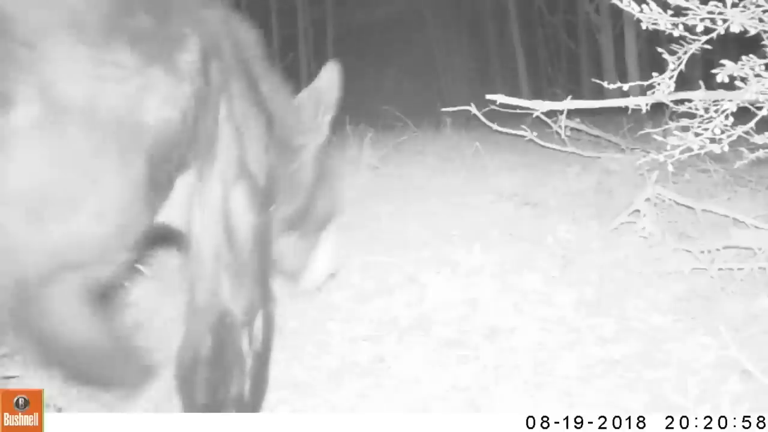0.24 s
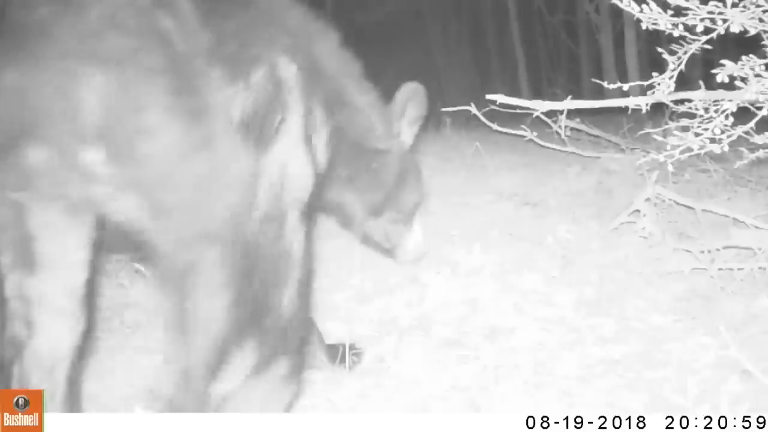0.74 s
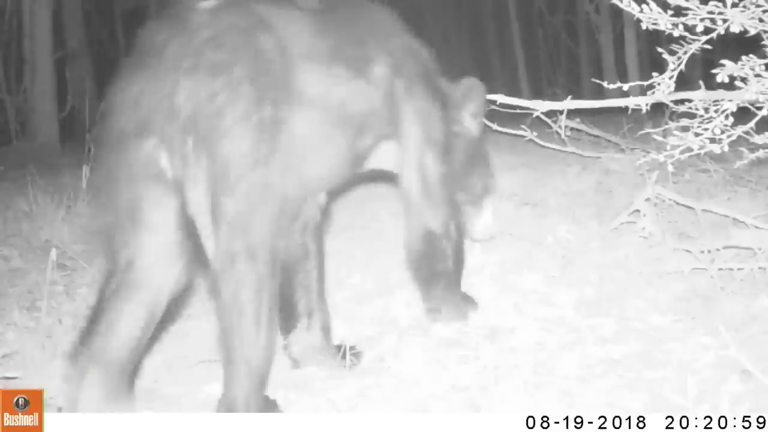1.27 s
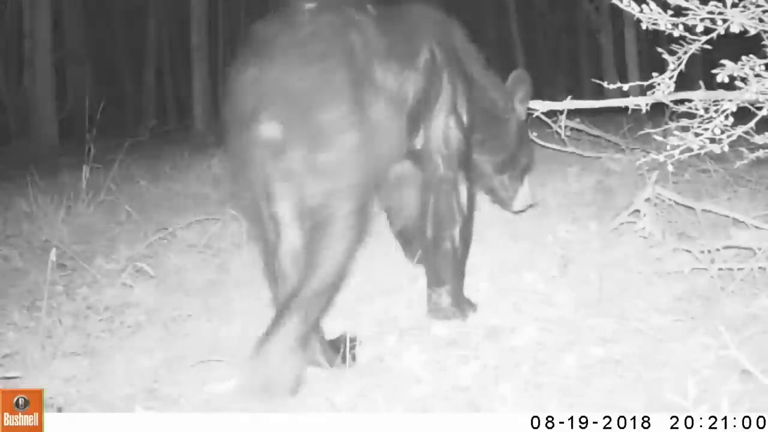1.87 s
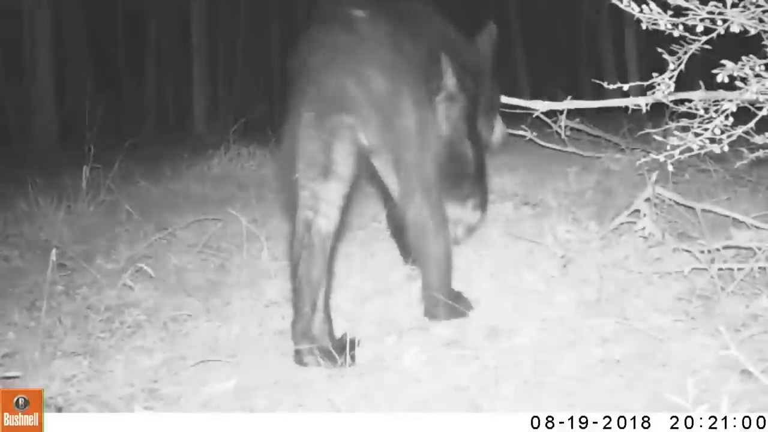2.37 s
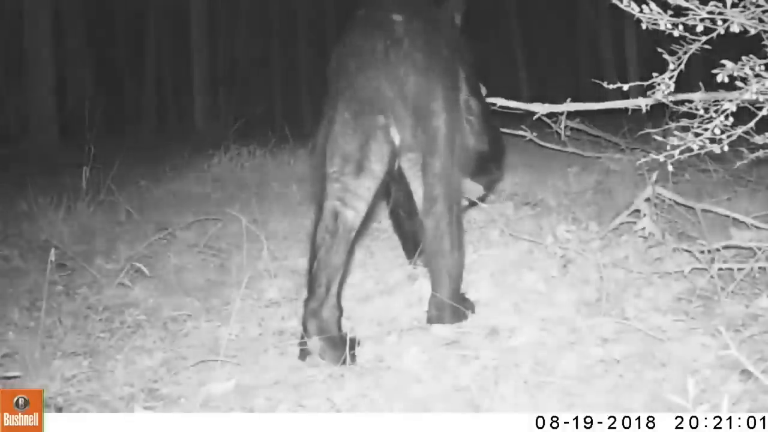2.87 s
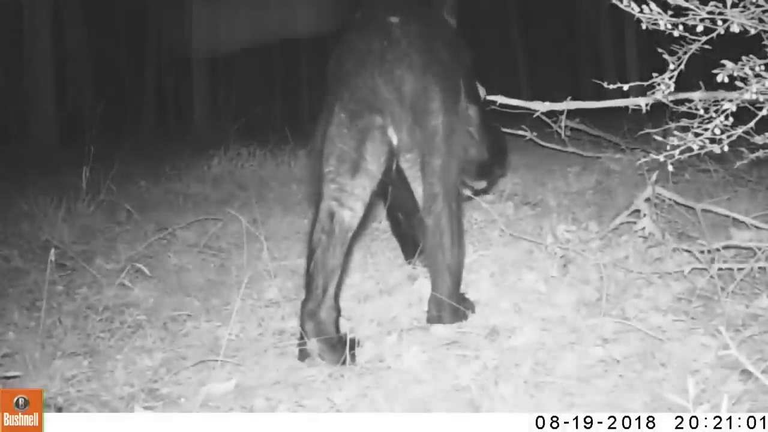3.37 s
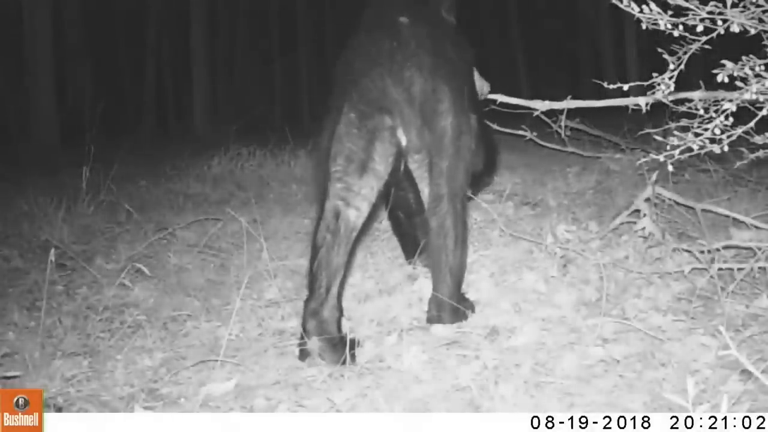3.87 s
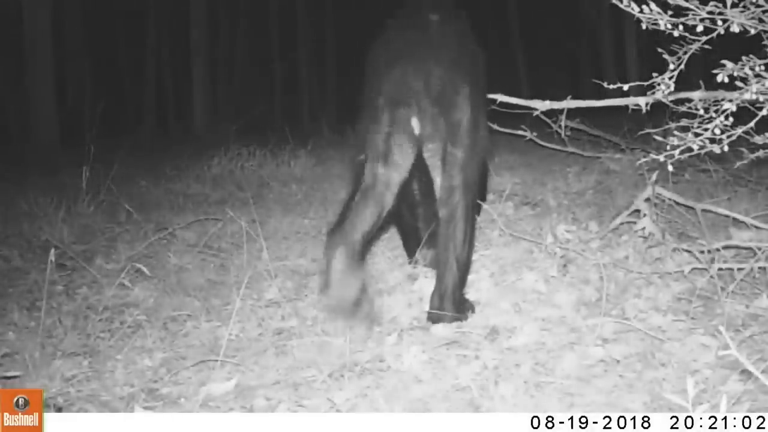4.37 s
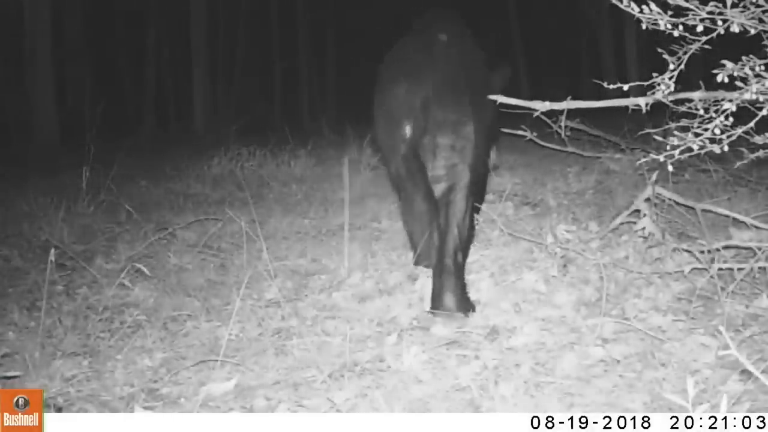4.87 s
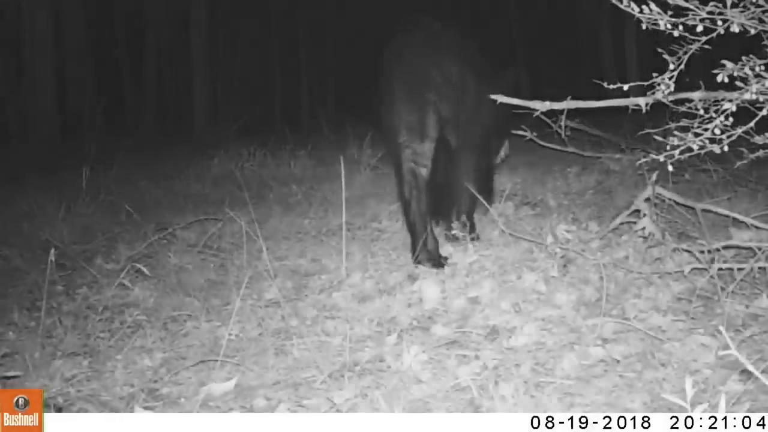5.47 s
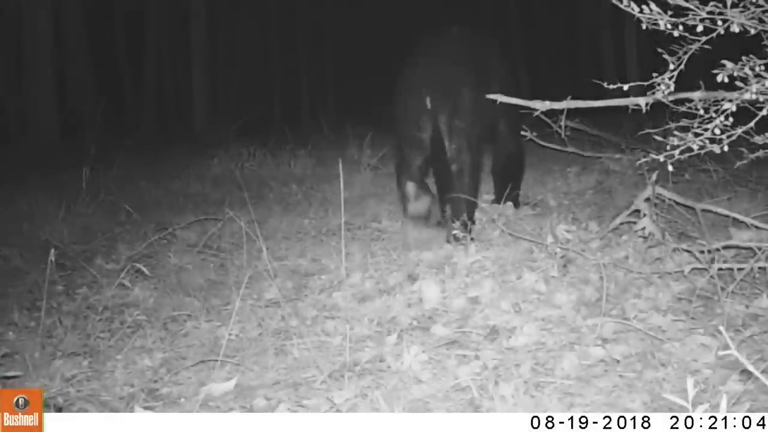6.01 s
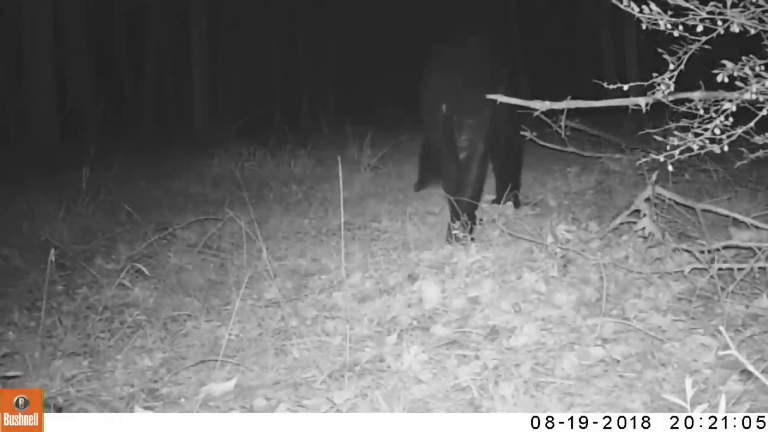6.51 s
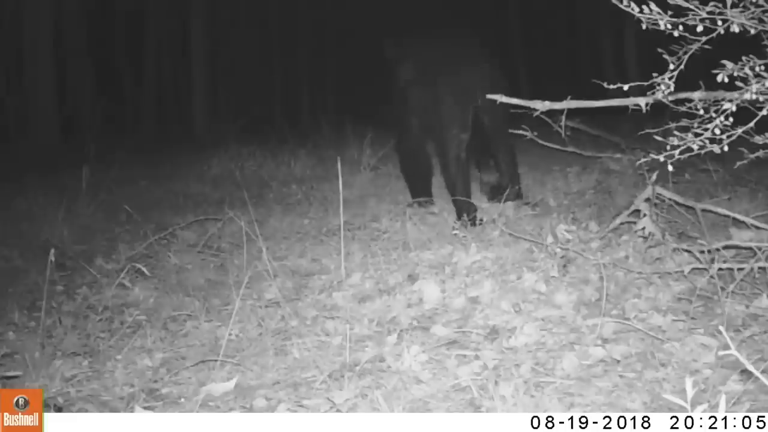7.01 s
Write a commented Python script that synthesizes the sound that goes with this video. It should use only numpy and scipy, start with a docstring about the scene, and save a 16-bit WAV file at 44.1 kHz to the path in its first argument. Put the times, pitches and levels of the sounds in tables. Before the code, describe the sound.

Nearly muted at first, then suddenly open: pulsing cricket trills, scratchy katydid rasps and a dense hissing buzz above a deep, soft night drone.

```python
"""Night at a wood's edge: one microphone starts nearly muted, then the level steps up after 0.385 s.
From the start a conehead's dense noise buzz comes and goes in bouts and crickets trade trills of falling tones.
Katydids soon rasp in phrases of tooth-modulated noise, while farther ones swell and sink in regular waves.
Throughout lie narrow noise bands of far tree crickets, a wavering drone in low air noise, and a soft roar."""
import sys
import numpy as np
from scipy import signal
from scipy.fft import rfft, irfft
from scipy.io import wavfile

SR = 44100
rng = np.random.default_rng(int(sys.argv[2]) if len(sys.argv) > 2 else 0)


def bounce(signal):
    """Save signal as a 16-bit WAV file at the path given by the first command-line argument."""
    frames = np.transpose(np.atleast_2d(signal))
    limited = np.clip(frames, -1, 1)
    pcm = np.round(limited * 32767).astype(np.int16)
    wavfile.write(sys.argv[1], SR, pcm)


N = 319725
TIME = np.arange(N) / SR
BINS = np.fft.rfftfreq(N, 1 / SR)


def amp(db):
    """Level is logarithmic: converts decibels to an amplitude gain."""
    return 10 ** (np.asarray(db) / 20)


def unit(x):
    """Normalization: scales to rms 1."""
    return x / np.sqrt(np.mean(x ** 2) + 1e-20)


def colour(x, points):
    """Linear filtering: shapes a spectrum by rows (Hz, dB), keeping the power of white noise."""
    hz, db = np.transpose(points)
    curve_db = np.interp(np.log(BINS + 1), np.log(hz), db)
    return irfft(rfft(x) * unit(amp(curve_db)), N)


def band(hz, width):
    """Band-limited noise: one bell-shaped band of rms 1; around 0 Hz it is a slow wander."""
    bell = np.exp(-2 * ((BINS - hz) / width) ** 2)
    return unit(irfft(rfft(rng.standard_normal(N)) * bell, N))


def add(mix, s, sound):
    """Superposition: mixes a sound in at time s."""
    part = mix[max(round(s * SR), 0):][:len(sound)]
    part += sound[:len(part)]


def woods(x, wet_db, t60):
    """Multiple scattering: trunks and leaves return sparse echoes that die by 60 dB in t60 seconds."""
    t = TIME[:SR]
    sparse = rng.random(SR) < .05
    taps = rng.standard_normal(SR) * sparse * amp(-60 * t / t60)
    echo = signal.fftconvolve(x, taps / np.linalg.norm(taps))[:len(x)]
    return (x + amp(wet_db) * echo) / np.hypot(1, amp(wet_db))


def rumble(rumble_db=-49.5, drone_db=-57, swell_db=1.0):
    """Frequency modulation: a deep drone wavers in pitch within slightly lumpy low air noise."""
    # colour of the rumble and its faint hiss: [hz, relative_db]
    air_colour = [(8, -4.5), (20, 1), (33, -2.5), (60, -5), (100, -8.5), (160, -13), (230, -18.5),
                  (400, -26), (750, -33.5), (1200, -38), (3000, -38), (7000, -50.5), (14000, -54)]
    air_level = amp(rumble_db + swell_db * band(0, 7.6))
    air = air_level * colour(rng.standard_normal(N), air_colour)
    drone_hz = 42.94 + 1.448 * band(0, 2.6)
    turns = np.cumsum(drone_hz) / SR
    drone_level = amp(drone_db + 0.54 * band(0, 6.2))
    return air + drone_level * unit(np.sin(2 * np.pi * turns))


def roar(level_db=-62, sink_db_per_s=0.11, wander_db=1.27):
    """Amplitude modulation: soft, distant noise sinks slowly, with brief swells and lulls."""
    # swells and lulls of the roar: [middle_s, length_s, rise_db], negative for a lull
    swells = [(0.968, 0.16, 5), (3.707, 0.24, 2.5), (5.397, 0.56, -2.5), (6.084, 0.12, 4.5)]
    # colour of the roar: [hz, relative_db]
    roar_colour = [(150, -23), (270, -2.5), (400, -1.5), (520, -10.5), (750, -20.5), (1300, -37),
                   (3000, -56)]
    swells_db = sum(db * np.exp(-(2 * (TIME - middle) / length) ** 2) for middle, length, db in swells)
    course_db = level_db - sink_db_per_s * TIME + swells_db + wander_db * band(0, 2.5)
    return amp(course_db) * colour(rng.standard_normal(N), roar_colour)


def chorus():
    """Incoherent summation: many far tree crickets blur into narrow bands, with thin whistles above."""
    # bands in which the far tree crickets sing: [pitch_hz, width_hz, level_db]
    far_bands = [(2048, 134, -67.5), (2170, 70, -72.5), (2333, 140, -69), (2534, 166, -65.5),
                 (2936, 63, -73.5), (2960, 410, -67.5), (3395, 140, -75)]
    # thin steady whistles: [pitch_hz, level_db]
    whistles = [(3965, -87), (6453, -86), (9490, -89), (9706, -94)]
    blur = sum(amp(db) * band(hz, width) for hz, width, db in far_bands)
    return blur + sum(amp(db) * band(hz, width=9) for hz, db in whistles)


def conehead(far_db=-83, rise_db_per_s=96, fall_db_per_s=71, waver_db=1.0):
    """Comb filtering: fixed echo paths cut fine lines into a dense buzz that swells, holds and dies away."""
    # bouts at full level, near or far: [start_s, end_s, level_db]
    bouts = [(-0.2, 1.43, -65), (1.5, 2.6, -77.5), (2.48, 4.28, -66), (4.35, 4.78, -82),
             (5.38, 6.88, -65.5)]
    # colour of the buzz: [hz, relative_db]
    buzz_colour = [(4500, -16), (6500, -3), (8000, 2), (9500, 5), (10500, 2.5), (11500, -2.5),
                   (12200, -17.5), (13800, -31)]
    buzz = unit(woods(colour(rng.standard_normal(N), buzz_colour), wet_db=-5, t60=.2))
    power = amp(far_db) ** 2  # a far buzz never stops
    for start, end, db in bouts:
        before_s = np.maximum(start - TIME, 0)
        after_s = np.maximum(TIME - end, 0)
        short_db = rise_db_per_s * before_s + fall_db_per_s * after_s
        power = power + amp(db - short_db) ** 2
    return amp(waver_db * band(0, 30)) * np.sqrt(power) * buzz


def katydids(near_db=-7, answer_db=-16, grit=0.49, flutter_db=1.5, uneven_db=1.4):
    """Stridulation: tooth strikes modulate wing noise into rasps; farther singers merge into waves."""
    # phrases of a near katydid: [start_s, rasp_count, rasp_step_s, relative_peak_db]
    phrases = [(0.326, 3, .12, -50), (1.052, 3, 0.11, -47), (1.823, 3, 0.11, -70), (2.719, 3, 0.12, -47.5),
               (3.56, 3, .1, -52), (4.228, 4, 0.12, -52), (5.17, 4, .119, -54), (6.037, 4, .125, -50),
               (6.709, 3, 0.11, -49)]
    # colour of a katydid's wing: [hz, relative_db]
    rasp_colour = [(1500, -26.5), (2000, -6.5), (2700, -5), (3600, 0.5), (4400, -1), (5300, 3), (6200, 1),
                   (7000, -7), (8000, -14), (10000, -29.5), (14000, -30)]
    rasp_s, crest_s = 0.11, 0.0367  # a rasp's length, and its peak after the beat
    wave_s, wave_crest_s = .835, 0.36  # time from wave to wave, and the first crest
    wave_db, lull_db = -56.5, -63.5  # levels at a crest and between waves
    wave_shape = 0.91  # higher gives narrower crests
    force, answer, t = np.zeros(N), np.zeros(N), TIME[:int(rasp_s * SR)]
    for start, count, step, db in phrases:
        for k in range(round(count)):
            teeth_per_s = rng.uniform(137.4, 210)
            teeth = 1 + grit * np.sin(2 * np.pi * (teeth_per_s * t + rng.random()))
            size = amp(db + near_db + uneven_db * rng.standard_normal())
            rasp = size * np.sin(np.pi * t / rasp_s) * teeth
            add(force, start + k * step + crest_s - rasp_s / 2, rasp)
        # neighbours join in loosely, from a beat before the phrase to a beat after it
        answer_s = (round(count) + 2) * step
        add(answer, start - step, amp(db + answer_db) * np.hanning(int(answer_s * SR)))
    near = woods(force * rng.standard_normal(N), wet_db=-7, t60=.3)
    # the farther katydids answer one another in regular waves
    wave = abs(np.cos(np.pi * (TIME - wave_crest_s) / wave_s)) ** wave_shape
    waves_level = amp(lull_db + (wave_db - lull_db) * wave)
    far = np.hypot(waves_level, answer) * amp(flutter_db * band(0, 41))
    return colour(near + far * rng.standard_normal(N), rasp_colour)


def crickets(far_db=-68, far_hz=5560, scatter_hz=30, slip_s=0.00046, uneven_db=1.13, tempo_spread=0.014):
    """Stridulation: each wing stroke is a tone that falls as the scraper slows; a trill's pitch arches."""
    # cricket trills: [start_s, end_s, level_db, wing_pitch_hz]
    trills = [(0.017, 0.47, -58.5, 5820), (0.487, 0.897, -62.5, 5650), (0.988, 1.52, -63.5, 5700),
              (1.459, 1.942, -58.5, 5870), (1.884, 2.618, -62, 5600), (2.545, 2.923, -59, 5870),
              (2.698, 3.133, -70, 5640), (3.174, 3.643, -62.5, 5620), (3.382, 3.776, -59, 5830),
              (3.704, 4.198, -63, 5650), (4.189, 4.604, -59, 5900), (4.349, 4.835, -60, 5630),
              (4.896, 5.332, -59.5, 5870), (4.979, 5.554, -62, 5620), (5.646, 6.202, -58, 5880),
              (5.809, 6.353, -60.5, 5640), (6.395, 6.717, -58.5, 5660), (6.528, 7.097, -60, 5840),
              (6.776, 7.301, -62.5, 5600)]
    strokes_per_s, at_wing_hz = 55, 5600
    strokes_per_wing_hz = .007  # a higher singer also strokes a little faster
    stroke_s, sweep_hz = .012, 560  # a stroke's length and its fall in pitch
    arch_hz, sag_hz = 147, 69.6  # rise and fall, and steady sinking, over a whole trill
    fade_share = 0.081  # share of a trill spent swelling, and again fading
    out, u = np.zeros(N), np.linspace(0, 1, int(stroke_s * SR))
    envelope = np.sin(np.pi * u) ** 2
    for start, end, db, hz in trills:
        trill, chance = np.zeros(SR), rng.standard_normal((64, 4))
        tempo = 1 + tempo_spread * rng.standard_normal()
        rate = (strokes_per_s + strokes_per_wing_hz * (hz - at_wing_hz)) * tempo
        for s, (slip, sharp, strong, phase) in zip(np.arange(0, end - start, 1 / rate), chance):
            along = s / (end - start)
            effort = np.sqrt(np.clip(min(along, 1 - along) / fade_share, 0, 1))
            arch = arch_hz * (np.sqrt(abs(np.sin(np.pi * along))) - 3 / 4) + sag_hz * (.5 - along)
            pitch = hz + arch + scatter_hz * sharp + sweep_hz * (.5 - u)
            # makes up for the silence between strokes
            size = effort * amp(db + uneven_db * strong) / np.sqrt(rate * stroke_s)
            tone = np.sin(2 * np.pi * (np.cumsum(pitch) / SR + phase))
            add(trill, s + slip_s * slip, size * unit(envelope * tone))
        add(out, start, woods(trill, wet_db=-6, t60=.2))
    # farther crickets of the same kind blur into one band
    return out + amp(far_db) * band(far_hz, width=690)


def scene(spread_db=-81):
    """Superposition: all sources sum at one microphone; only a faint hiss differs between the channels."""
    # colour of the hiss that differs between the channels: [hz, relative_db]
    hiss_colour = [(100, -42), (500, -9), (1000, 1), (1600, 14.5), (2400, -30), (3800, 24), (5200, -19),
                   (9000, -14), (13000, -6.5)]
    mono = rumble() + roar() + chorus() + conehead() + katydids() + crickets()
    side = amp(spread_db) * colour(rng.standard_normal(N), hiss_colour)
    return np.array([mono + side, mono - side])


def record(dry, muted_db=-24.0, open_s=0.385, edge_hz=13850):
    """Gain and low-pass filtering: the level starts low and steps up at once; then the band limit."""
    muting = np.clip((open_s - TIME) / 0.00014 + 1, 0, 1)  # 1 while muted, 0 once open
    opened = dry * amp(muted_db * muting)
    low_pass = signal.firwin(511, edge_hz, window=("kaiser", 9), fs=SR)
    return signal.oaconvolve(opened, low_pass[None], "same")


dry = scene()
out = record(dry)
bounce(out)
```